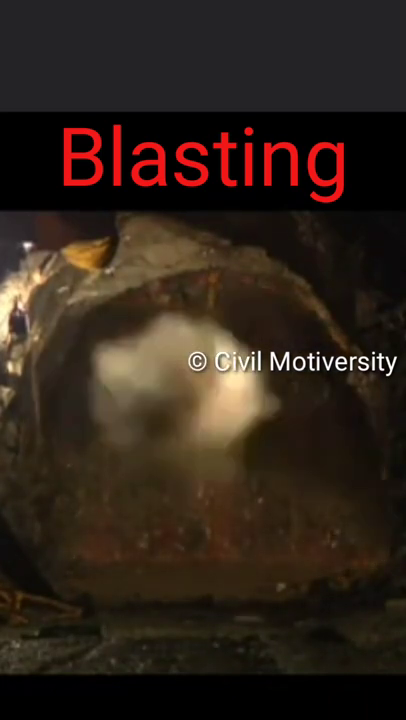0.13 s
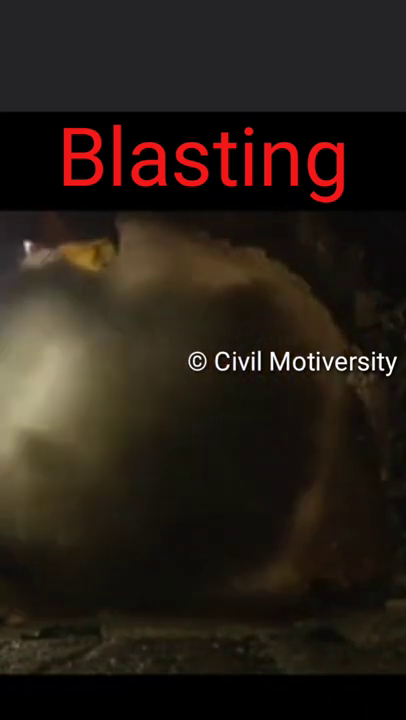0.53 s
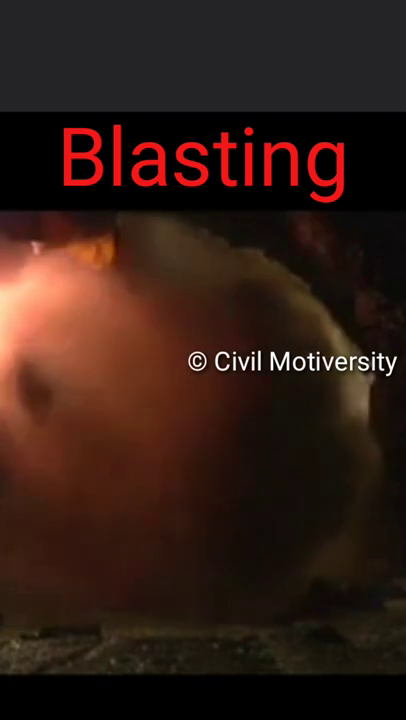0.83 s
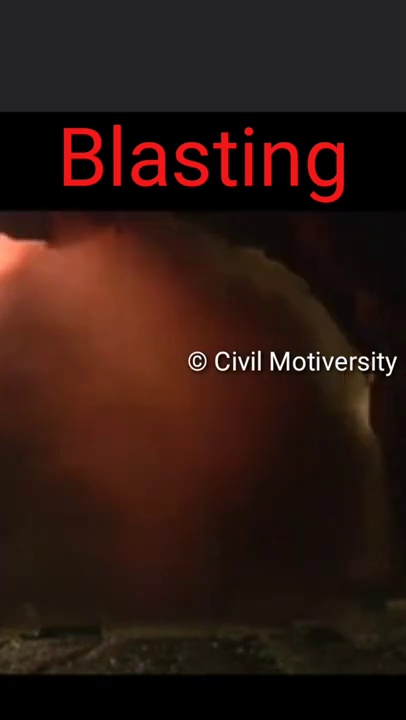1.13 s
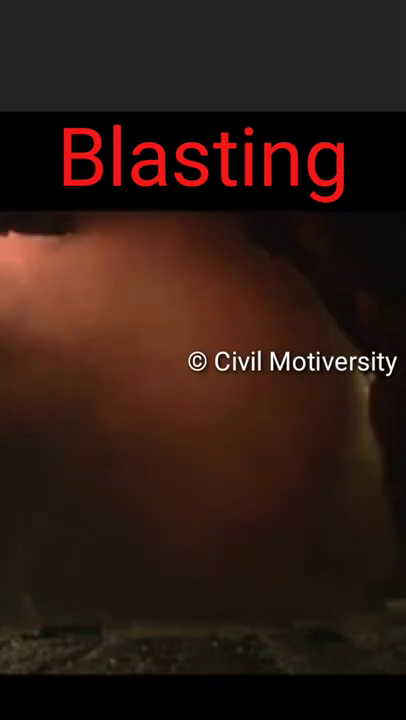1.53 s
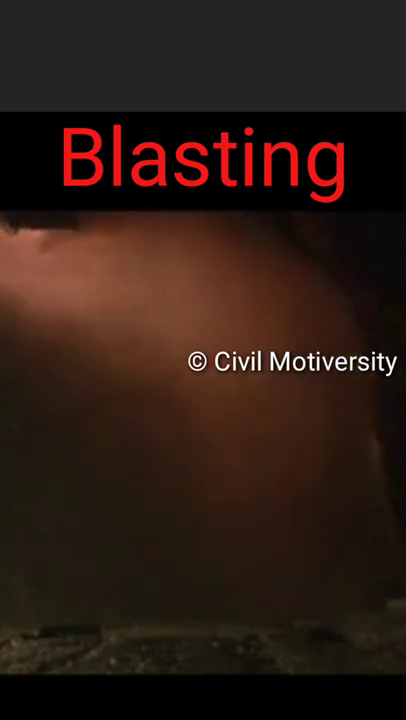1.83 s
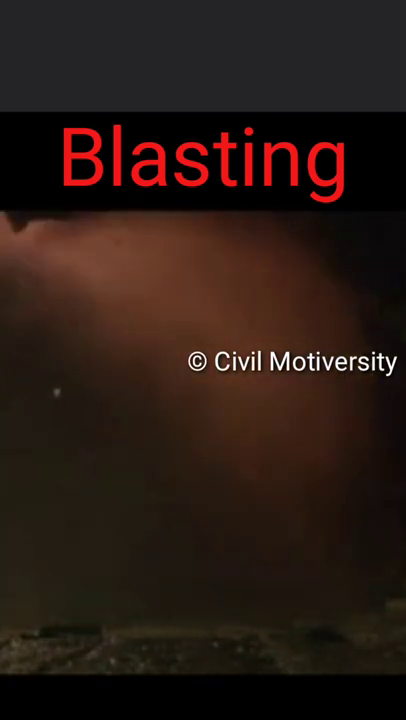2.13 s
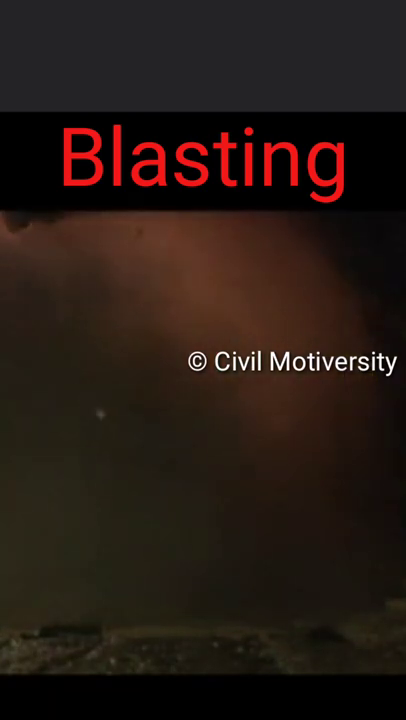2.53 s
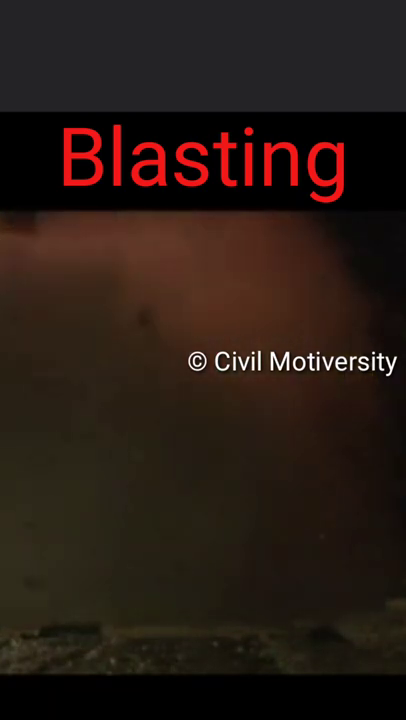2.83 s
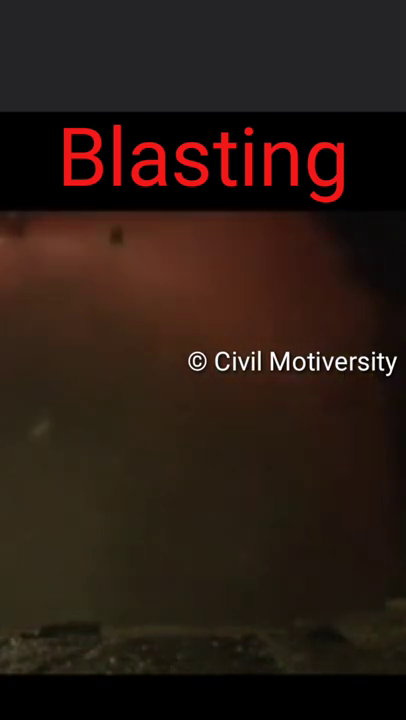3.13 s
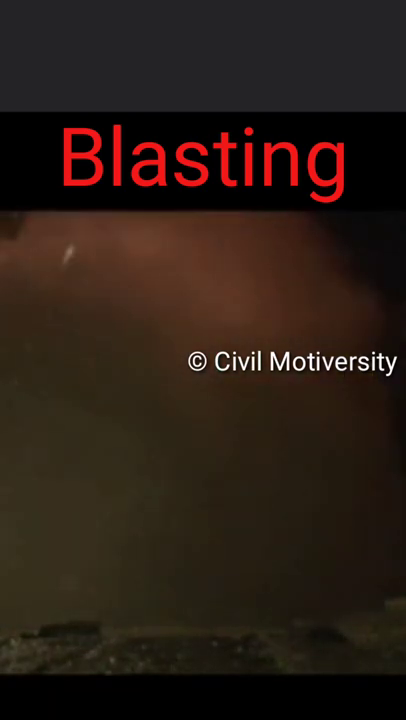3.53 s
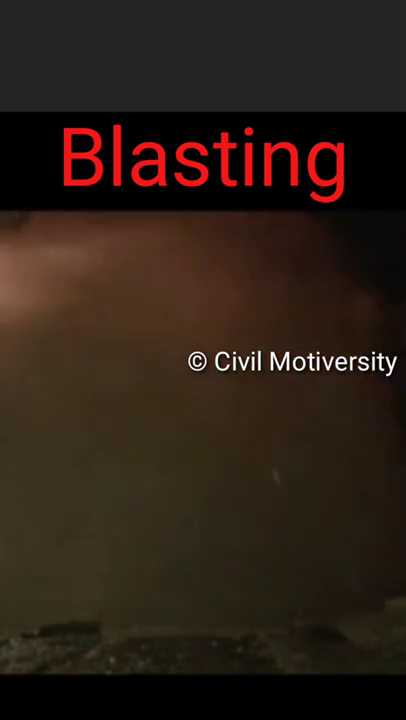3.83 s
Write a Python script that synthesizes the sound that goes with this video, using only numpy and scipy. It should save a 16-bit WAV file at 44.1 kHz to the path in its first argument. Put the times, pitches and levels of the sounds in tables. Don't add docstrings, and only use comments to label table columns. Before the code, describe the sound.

A tunnel rock blast starts with a muffled low ground rumble. At about 0.35 s the air blast hits, loudest around 0.4 to 0.6 s, flattened and distorted by the overloaded microphone, with abrupt thuds, rattling grit and dry stone cracks. From 0.6 s the quieter roar stays rough, then darkens. After 2 s it flutters in bassy surges and short lulls, with soft grit showers and small clicks near 2.2, 2.5, 3.5 and 3.7 s.

```python
import sys
import numpy as np
from scipy import signal
from scipy.fft import rfft, irfft
from scipy.io import wavfile
from scipy.ndimage import uniform_filter1d, minimum_filter1d

SR = 44100
rng = np.random.default_rng(int(sys.argv[2]) if len(sys.argv) > 2 else 0)


def pcm_store(signal):
    levels = np.round(np.clip(np.atleast_2d(signal), -1, 1) * 32767)
    wavfile.write(sys.argv[1], SR, levels.astype(np.int16).T)


def natural_amplitude(level_db):
    exponent = np.asarray(level_db, float) / 20
    return 10 ** exponent


N = 176400

AGE_S = 2.637
PATCHY_FROM_HZ, PATCHY_TO_HZ = 4000, 8000

# start_s, length_s, height_db
FLIPS = [
    (.4363, .0009, -20),
    (2.21255, .00011, -30.5),
    (2.4574, .0012, -31),
    (3.4767, .0009, -36),
    (3.6677, .00015, -37),
]
# pitch_hz, level_db (per Hz)
DUST_TONE = [(1500, -20), (3000, 8.5), (5000, 1.5), (8000, 2), (10000, -10)]


def evened(x):
    return x / np.sqrt(np.mean(x ** 2) + 1e-20)


def noise(points):
    hz, db = np.transpose(points)
    log_hz = np.log(np.fft.rfftfreq(N, 1 / SR) + 1)
    gain = natural_amplitude(np.interp(log_hz, np.log(hz), db, left=-60))
    return evened(irfft(rfft(rng.standard_normal(N)) * gain, N))


def wander(hz):
    return noise([(hz / 8, -20), (hz / 4, 0), (hz, -3), (2 * hz, -25), (20 * hz, -90)])


def bump(t, s, half):
    return np.exp(-((t - s) / half) ** 4)


def bumps(rows):
    t = np.arange(0, N, 12) / SR
    total = sum(height * bump(t, s, half) for s, half, height in rows)
    return np.interp(np.arange(N) / SR, t, total)


def patchy(x, least=.2):
    streak_db, island_db, full_after_s = 4, 3.5, .8
    hz, t, z = signal.stft(x, SR, nperseg=1024, noverlap=768)
    a, b = rng.standard_normal((z.shape[1], z.shape[0], 2)).T
    streaks = evened(uniform_filter1d(a, size=9, axis=1))
    islands = evened(uniform_filter1d(uniform_filter1d(b, size=5, axis=1), size=24, axis=0))
    share = 1 / (1 + (PATCHY_FROM_HZ / (hz + 1)) ** 4) / (1 + (hz / PATCHY_TO_HZ) ** 12)
    growth = np.clip(t / full_after_s, least, 1) ** 2
    lift_db = streak_db * np.minimum(streaks, 1) + island_db * np.minimum(islands, 1) + 0.5
    z = z * natural_amplitude(share[:, None] * growth * lift_db)
    return signal.istft(z, SR, nperseg=1024, noverlap=768)[1][:N]


def blast(t):
    # time_s, rail_level_db, overdrive_db, grit_db (under the rail)
    course = [(0.33, -28, -30, -27.5), (0.353, -20, -20.5, -24), (0.399, -27, -5.5, -14),
              (.415, -25, 1, -17), (0.549, -23, 10.5, -18.5), (0.588, -32, 6.5, -13),
              (0.679, -27.5, 1.5, -13), (0.718, -28.5, 5, -18.5), (.8, -28.5, 3, -17.5),
              (1.099, -29, 8, -18), (1.452, -28.5, 4, -19.5), (1.903, -29.5, 3.5, -25),
              (2.3, -31.5, 1.5, -32.5), (2.802, -31.5, -2, -35), (3.302, -32.5, -2.5, -31.5),
              (3.699, -38.5, 3, -30.5), (4.0, -36.5, -9, -26.5)]
    # middle_s, half_length_s, depth_db
    lulls = [(0.628, 0.0058, 21), (1.31, 0.0089, 18), (1.359, 0.0074, 6), (1.772, 0.028, 8),
             (1.861, 0.011, 19.5), (2.164, 0.011, 47), (2.24, 0.0052, 16), (2.33, 0.013, 19),
             (2.385, 0.0071, 13), (2.5, 0.013, 5.5), (2.613, 0.012, 22), (2.756, 0.0095, 17.5),
             (2.806, 0.015, 9.5), (2.84, 0.0087, 18), (2.953, 0.0094, 26), (3.048, 0.0075, 26),
             (3.166, 0.0077, 14), (3.22, 0.0071, 23), (3.29, 0.0098, 24.5), (3.35, 0.013, 23),
             (3.435, 0.0044, 26), (3.515, 0.005, 7), (3.586, 0.0075, 17), (3.638, 0.012, 23),
             (3.74, 0.0077, 26), (3.775, 0.0038, 34), (3.83, 0.0072, 29), (3.89, 0.0063, 27),
             (3.925, 0.0067, 35)]
    knee, arrival_s = 3, .003
    s, *columns = np.transpose(course)
    rail_db, drive_db, grit_db = (np.interp(t, s, c) for c in columns)
    lull_db = bumps(lulls)
    grit_db = grit_level(grit_db, lull_db)
    on = np.clip((t - s[0]) / arrival_s, 0, 1)
    air = on * pressure(t, drive_db - lull_db, grit_db)
    railed = air / (1 + abs(air) ** knee) ** (1 / knee)
    return natural_amplitude(rail_db) * (railed + on * swing_hash(t, railed, drive_db, grit_db))


def pressure(t, drive_db, grit_db):
    # pitch_hz, level_db (per Hz)
    grit_tone = [(200, 5.5), (700, -3.5), (2000, -19.5), (4000, -26.5), (6000, -43.5), (10000, -57.5)]
    trough_s, trough_db = .0042, 8
    air = rumble(t, drive_db)
    dips = bumps([(s + length, trough_s, 1) for s, length, _ in FLIPS])
    air -= dips * (air + natural_amplitude(trough_db))
    add_fronts(air, t)
    return air + noise(grit_tone) * natural_amplitude(grit_db)


def rumble(t, drive_db):
    # pitch_hz, level_db (per Hz)
    young = [(15, -27), (40, 1), (90, 2), (160, -9.5), (300, -18.5), (700, -39), (2000, -62),
             (10000, -79.5)]
    # pitch_hz, level_db (per Hz)
    old = [(15, -13), (40, 3.5), (70, 1), (130, -12.5), (250, -25.5), (600, -43.5), (2000, -62.5),
           (10000, -87.5)]
    surge_db = 2
    age = np.clip(t / AGE_S, 0, 1)
    roar = np.sqrt(1 - age) * noise(young) + np.sqrt(age) * noise(old)
    return roar * natural_amplitude(drive_db + surge_db * wander(21))


def add_fronts(air, t):
    # time_s, steepness (sign is direction), reach_s
    shock_fronts = [(.3711, -.7, .014), (.3968, .45, .001), (.3989, -.8, .0015), (.4035, 1.15, .004),
                    (.4205, .7, .0012), (.4244, .5, .002), (.4307, -.5, .004), (.4402, 1.7, .002),
                    (.4454, -.55, .004), (.4618, 1.1, .007), (.4685, -.55, .003), (.4738, 1.2, .0015),
                    (.4765, -.7, .002), (.4811, .5, .003), (.4897, -.6, .003), (.4937, .4, .003),
                    (.5032, -.3, .008), (.5163, 1.2, .005), (.5266, .35, .003), (.5367, -.35, .005),
                    (.5415, .85, .002), (.544, -.5, .0015), (.5497, .35, .004), (.5622, .45, .004),
                    (.5811, .6, .006),
                    (.608, -.7, .003), (.6126, .55, .003), (.6482, .7, .003), (.6637, .75, .002),
                   (.6701, .8, .002), (.6799, .5, .003), (.6886, -.8, .002), (.7066, .45, .004),
                   (.7347, -1.15, .003), (.7552, .8, .004), (.7802, 1.05, .003), (.7886, .7, .003),
                   (.7953, -.65, .003), (.8222, 1.55, .004), (.8429, .6, .004), (.8543, .6, .003),
                   (.865, .7, .004), (.8744, -.65, .004), (.9185, .9, .003), (.9256, .6, .003),
                   (.9492, .75, .002), (.966, .5, .004), (.9835, .9, .004), (.9956, .45, .004),
                   (1.0028, -.65, .003), (1.0347, .95, .003), (1.0445, .55, .003), (1.0702, .7, .002),
                   (1.0848, -.85, .003), (1.0893, .7, .002), (1.1511, .5, .003), (1.1881, .6, .004),
                   (1.2171, -.4, .004), (1.2533, .6, .004), (1.3306, .9, .004), (1.3973, .65, .005),
                   (1.4548, .9, .003), (1.4654, .55, .003), (1.5156, .55, .004), (1.6051, .45, .003),
                   (1.78, .7, .005), (1.8273, .6, .003), (1.8918, .8, .005), (1.9117, .4, .004),
                   (1.9784, -.45, .004), (2.0153, .45, .004), (2.126, .4, .004), (2.2916, .55, .005),
                   (2.7771, .5, .003), (2.9037, .5, .005), (3.0262, .65, .006), (3.1396, .45, .005),
                   (3.8041, .55, .005)]
    front_db, snap = 4, 0.48
    slope_per_s, soften_per_s = 4660, 0.3
    for s, steep, reach in shock_fronts:
        span = slice(round((s - 2 * reach) * SR), round((s + 2 * reach) * SR))
        near = bump(t[span], s, reach)
        slope = abs(steep) * slope_per_s * np.exp(-soften_per_s * s) / natural_amplitude(front_db)
        u = (t[span] - s) * slope
        edge = np.where(u < 0, np.tanh(u / snap), np.tanh(u))
        air[span] += near * (np.sign(steep) * natural_amplitude(front_db) * edge - air[span])


def grit_level(grit_db, lull_db):
    # middle_s, half_length_s, lift_db
    grit_showers = [
        (0.3528, .017, 16),
        (.337, 0.0034, 10.5),
                    (0.392, 0.009, 12.5), (0.421, 0.0099, 8.5), (0.412, 0.02, 2), (0.442, 0.0026, 11.5),
               (0.46, 0.0026, 10), (0.522, 0.0039, 11), (0.67, 0.012, 0.5), (0.77, 0.014, 6),
               (0.859, 0.0099, 4.5), (0.927, 0.0069, 8.5), (1.037, 0.017, 3.5), (1.25, 0.025, 3.5),
               (1.43, 0.05, 4.5), (1.54, 0.0056, 3.5), (1.786, 0.008, 6), (1.882, 0.059, 3),
               (1.97, 0.006, -2), (2.054, 0.044, 7), (2.127, 0.013, 5), (2.177, 0.016, 12),
               (2.294, 0.0064, 12), (2.428, 0.015, 8), (2.53, 0.032, 4.5), (2.687, 0.01, 12),
               (2.778, 0.029, 9.5), (2.903, 0.014, 11.5), (3.069, 0.017, 10), (3.14, 0.015, 6),
               (3.202, 0.012, 7), (3.558, 0.028, 7.5), (3.627, 0.0092, 10.5), (3.8, 0.0083, 7)]
    flicker_db = 0.5
    return grit_db - 10.0 + flicker_db * wander(64) + bumps(grit_showers) - 0.11 * lull_db


def swing_hash(t, railed, drive_db, grit_db):
    # pitch_hz, level_db (per Hz)
    hash_tone = [(200, 10.5), (700, -4), (2000, -14.5), (4000, -27), (6300, -35.5), (8200, -35),
                 (10000, -52)]
    hash_db, crackle_db, crackle_fade_s = -1.5, 4.5, 1.1
    spray, spray_s = 0.52, 0.0048
    swing = spray_s * SR * uniform_filter1d(abs(np.gradient(railed)), round(spray_s * SR))
    crackle = crackle_db * bump(t, 0, crackle_fade_s) * wander(400)
    level_db = grit_db + hash_db + crackle + 0.63 * np.minimum(drive_db, 0)
    return patchy(noise(hash_tone) * natural_amplitude(level_db) * (0.82 + spray * swing))


def rail_flips(t):
    edge_s = .00003
    flips = 0
    for s, length, db in FLIPS:
        up, down = np.tanh((t - s) / edge_s), np.tanh((t - s - length) / edge_s)
        flips = flips + natural_amplitude(db) * .5 * (up - down)
    return flips


def stone_cracks():
    # middle_s, half_length_s, level_db
    cracks = [(0.406, 0.00083, -59), (0.436, 0.002, -51), (.4618, 0.0015, -58), (0.49, 0.0022, -57),
              (0.515, 0.0008, -57), (.5415, .001, -63), (0.558, 0.00088, -60), (0.58, .001, -62),
              (.6126, .001, -68), (.7066, .001, -69), (0.752, 0.0011, -62.5), (.7802, .001, -59),
              (0.79, .001, -60), (0.8225, .001, -56), (0.947, .002, -66), (1.037, .0015, -65.5),
              (1.07, 0.0014, -68.5), (1.088, 0.001, -63.5), (1.186, .001, -69), (1.332, 0.0022, -67),
              (1.345, 0.0018, -77), (1.453, 0.0013, -75), (1.892, 0.0013, -65), (3.027, 0.00071, -68)]
    halo_s, halo_db = 0.0049, -36.5
    halos = [(s + 0.0015, halo_s, db + halo_db) for s, _, db in FLIPS]
    return noise(DUST_TONE) * bumps([(s, half, natural_amplitude(db)) for s, half, db in cracks + halos])


def ground_shake(t):
    # pitch_hz, level_db (per Hz)
    ground = [(20, -40), (55, 3.5), (110, 3.5), (200, -8), (370, -20), (570, -34.5), (1460, -48),
              (3200, -53.5), (10000, -76.5)]
    level_db, end_s, fall_s = -34, 0.37, 0.013
    ending = .5 * (1 - np.tanh((t - end_s) / fall_s))
    return noise(ground) * natural_amplitude(level_db + 0.45 * wander(30)) * ending


def fine_dust():
    # middle_s, half_length_s, level_db
    puffs = [
        (0.136, 0.12, -96),
        (0.467, 0.037, -74),
        (0.563, 0.018, -76),
        (0.786, 0.012, -81),
        (2.55, .03, -89),
        (2.78, .02, -87),
        (3.093, .03, -90),
        (3.55, 0.034, -89.5),
        (1.652, 0.035, -70),
        (2.082, 0.051, -82),
    ]
    return noise(DUST_TONE) * bumps([(s, half, natural_amplitude(db)) for s, half, db in puffs])


def scene():
    t = np.arange(N) / SR
    fade_in_s = .006
    background = patchy(fine_dust() + ground_shake(t), least=0.82) + stone_cracks()
    return (blast(t) + rail_flips(t) + background * np.minimum(t / fade_in_s, 1))[None]


def droop(dry):
    firm_hz, loose_hz = 4, 22
    firm_until_s, change_s, share_at_first = 1, 0.0136, .45
    firm, loose = (signal.lfilter(*signal.butter(1, hz, "high", fs=SR), dry) for hz in (firm_hz, loose_hz))
    t = np.arange(N) / SR
    switch = .5 + .5 * np.tanh((t - firm_until_s) / change_s)
    share = switch * np.interp(t, [firm_until_s, AGE_S], [share_at_first, 1])
    return firm + share * (loose - firm)


def thin_upper_mids(x):
    threshold_db, depth_db, crest_db = 1.5, -20, 15
    hz, t, z = signal.stft(x, SR, nperseg=2048, noverlap=1536)
    power = uniform_filter1d(abs(z) ** 2, size=3, axis=1)
    weak = power < uniform_filter1d(power, size=31, axis=0) * natural_amplitude(2 * threshold_db)
    treble = np.diff(x, n=2, prepend=[0, 0]) ** 2
    peak = -minimum_filter1d(-treble, size=1500)
    crest = peak / (uniform_filter1d(treble, size=1500) + 1e-20)
    steady = np.interp(t, np.arange(N) / SR, crest) < natural_amplitude(2 * crest_db)
    band = (hz > PATCHY_FROM_HZ) & (hz < PATCHY_TO_HZ)
    z = z * natural_amplitude(np.where(weak, depth_db, 2) * band[:, None] * steady)
    return signal.istft(z, SR, nperseg=2048, noverlap=1536)[1][:N]


def top_cut(x):
    return signal.sosfilt(signal.butter(12, 15600, fs=SR, output="sos"), x)


def record(dry):
    edge_hz, hiss_db = 10500, -96.5
    low_pass = signal.firwin(127, edge_hz, window=("kaiser", 7), fs=SR)
    x = signal.oaconvolve(droop(dry), low_pass[None], "same")
    mix = thin_upper_mids(x[0])[None] + natural_amplitude(hiss_db) * rng.standard_normal(x.shape)
    return top_cut(mix)


dry = scene()
out = record(dry)
pcm_store(out)
```